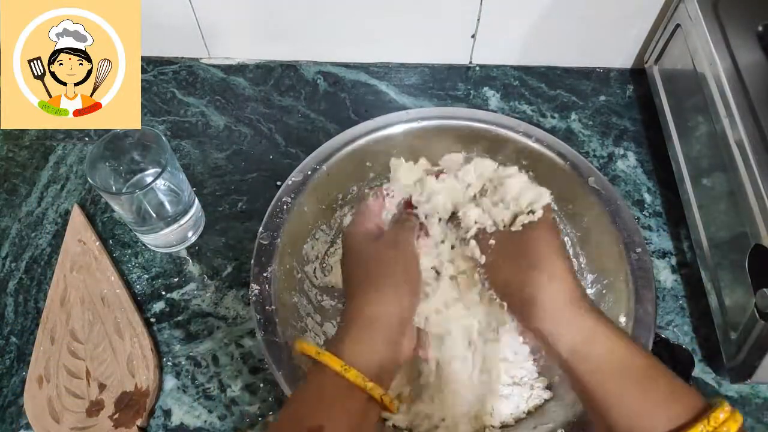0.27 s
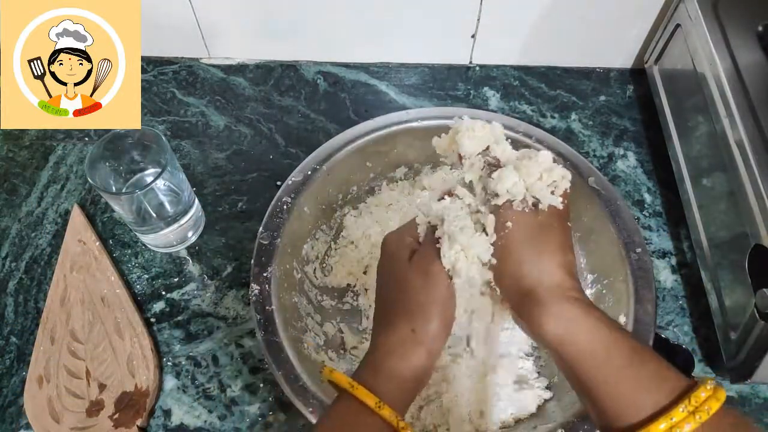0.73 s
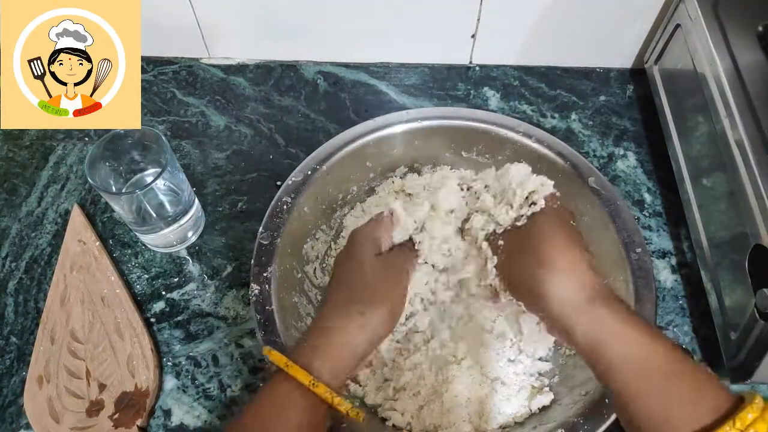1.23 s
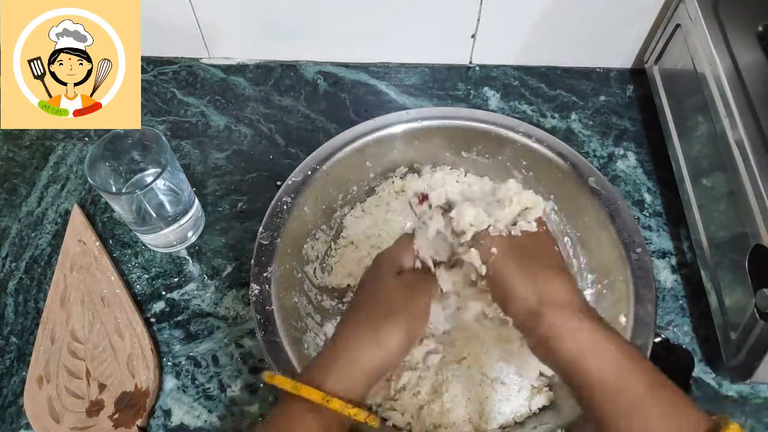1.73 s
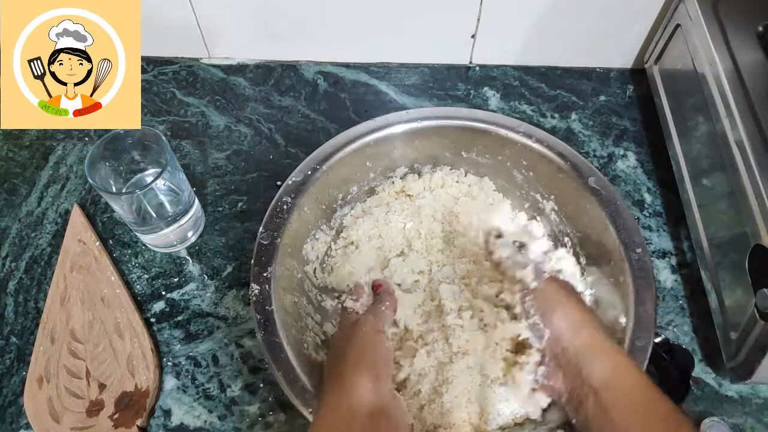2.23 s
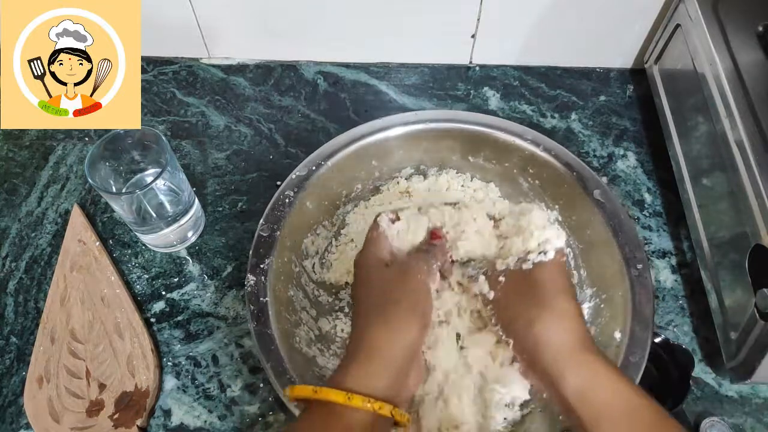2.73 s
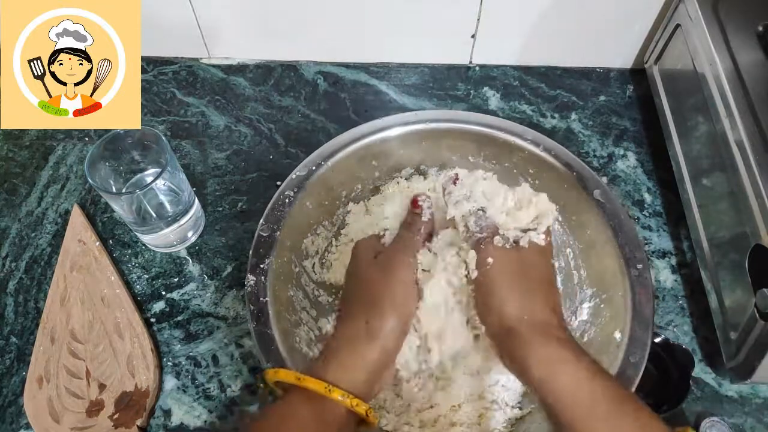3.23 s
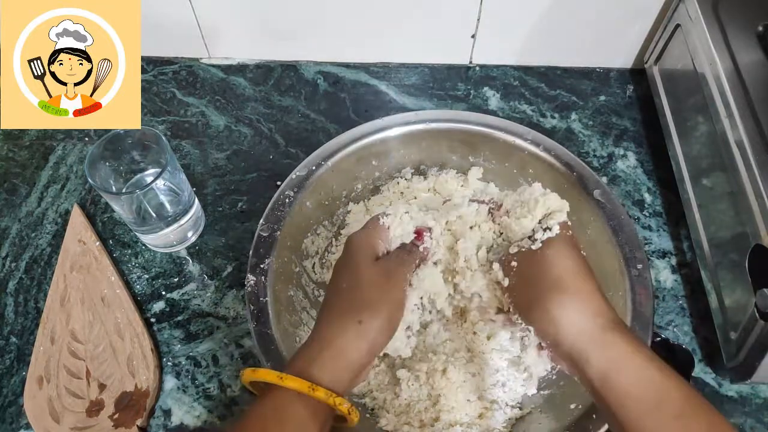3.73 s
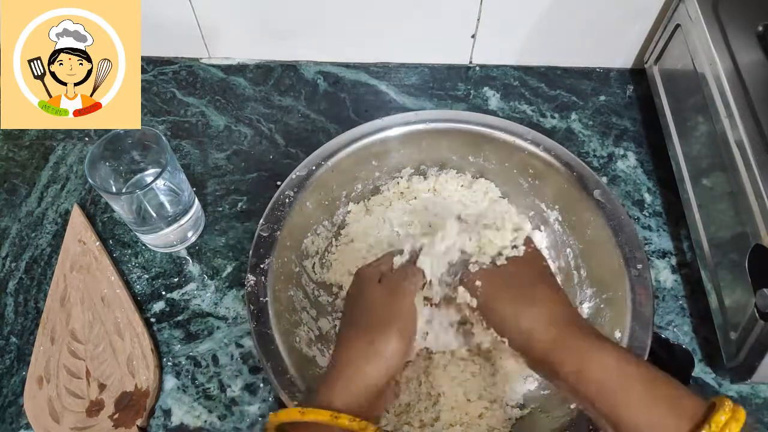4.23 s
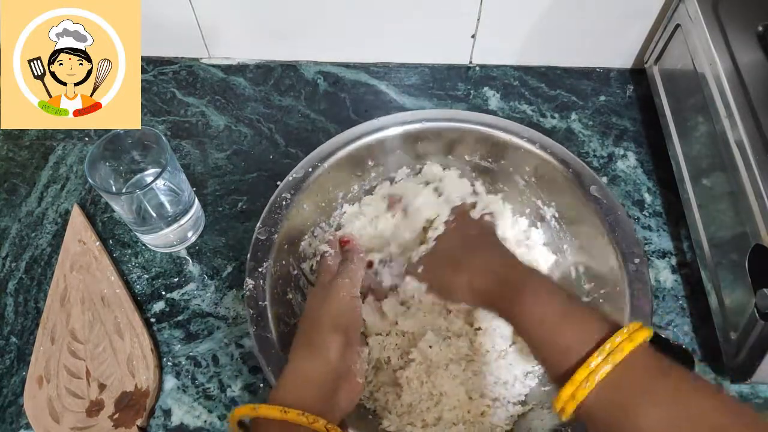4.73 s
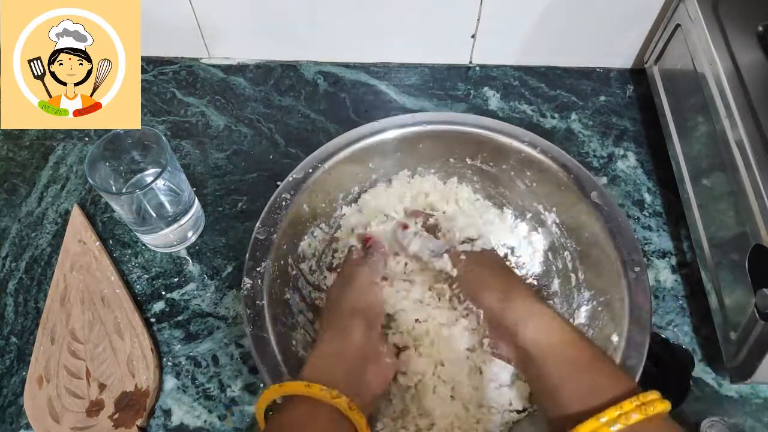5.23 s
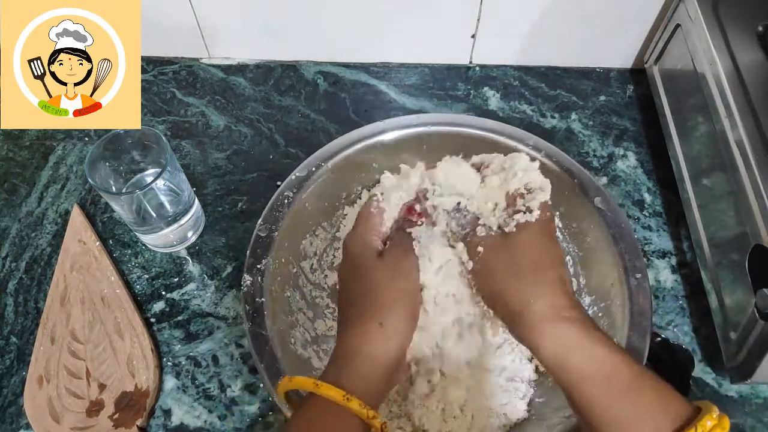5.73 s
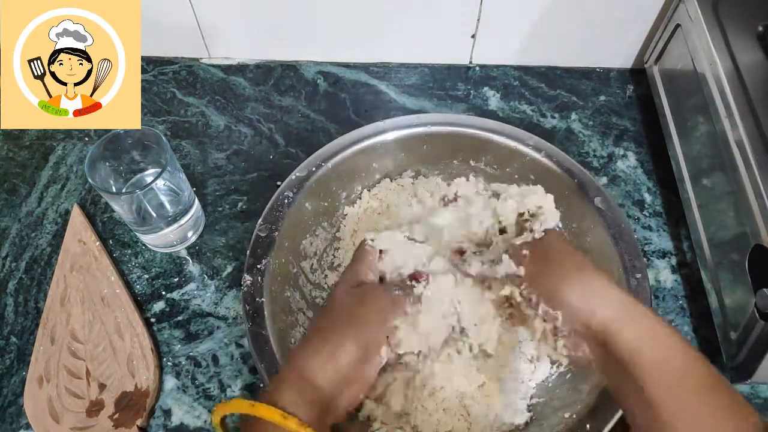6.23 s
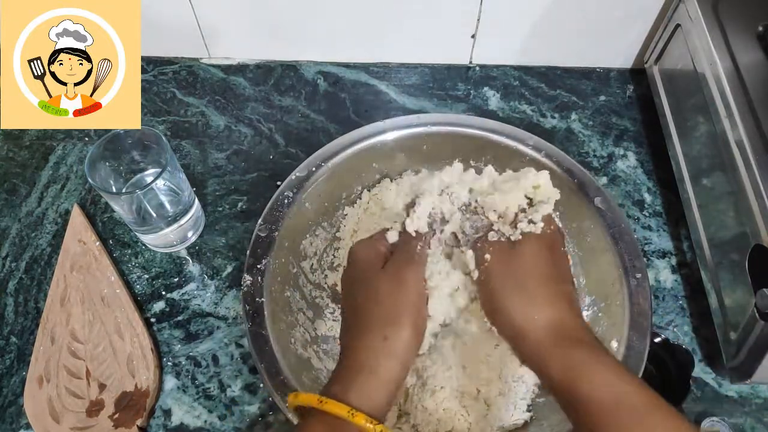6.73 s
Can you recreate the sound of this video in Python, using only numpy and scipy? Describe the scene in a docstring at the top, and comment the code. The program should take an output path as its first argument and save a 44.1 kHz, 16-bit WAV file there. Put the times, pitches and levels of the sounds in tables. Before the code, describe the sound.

A wide steel bowl knocks, rings and rattles on a stone counter. Two hands then rub a crumbly flour mixture in it, with soft rustling, brief swishes and light ticks of nails and crumbs on the metal. Past the middle a nail scrapes once and the bowl rocks and clanks again. Two short rough scuffs come near the end. A small tiled kitchen drones faintly underneath.

```python
"""A wide steel bowl knocks, rings and rattles on a stone counter, over a small tiled kitchen's low drone.
Two hands rub a crumbly flour mixture in it, and now and then it rocks on the stone again.
Lumps rustle, flour swishes over the steel, crumbs and nails tick, and a fingertip makes the wall sing.
A nail scrapes once, and two short rough scuffs come near the end.
Noise suppression turns quiet treble down, so the faintest rubbing fades in and out."""
import sys
import numpy as np
from scipy import signal
from scipy.fft import rfft, irfft
from scipy.io import wavfile
from scipy.ndimage import uniform_filter1d

SR = 44100
rng = np.random.default_rng(int(sys.argv[2]) if len(sys.argv) > 2 else 0)


def pcm_store(signal):
    """Save signal as 16-bit PCM."""
    levels = np.round(np.clip(np.atleast_2d(signal), -1, 1) * 32767)
    wavfile.write(sys.argv[1], SR, levels.astype(np.int16).T)


N = 307893


def amp(db):
    """Decibels to gain."""
    return 10 ** (np.asarray(db) / 20)


def unit(x):
    """Scales to rms 1."""
    return x / np.sqrt(np.mean(x ** 2) + 1e-20)


def read(points, hz):
    """Reads a curve on a log-frequency axis."""
    f, value = np.transpose(points)
    return np.interp(np.log(hz + 1), np.log(f + 1), value)


def add(mix, s, sound):
    """Mixes a sound in at time s."""
    part = mix[max(round(s * SR), 0):][:len(sound)]
    part += sound[:len(part)]


def attack(t, rise_s):
    """An envelope that eases up from 0 to 1."""
    return 1 - np.exp(-t / rise_s)


def decay(t, t60):
    """An envelope that falls 60 dB in t60 seconds."""
    return amp(-60 * t / t60)


def noise(count, db_at):
    """Noise of rms 1 whose spectrum follows a rule in dB."""
    spectrum = rfft(rng.standard_normal(count))
    return unit(irfft(spectrum * amp(db_at(np.fft.rfftfreq(count, 1 / SR))), count))


def wander(count, hz):
    """Slow random motion of rms 1."""
    return noise(count, lambda f: -10 * np.log10(1 + (f / hz) ** 4))


def impacts(count, per_s, spread_db):
    """Randomly timed impulses of uneven size."""
    hits = rng.random(count) < per_s / SR
    return hits * amp(spread_db * np.minimum(rng.exponential(1, count), 3))


def narrow_band(x, hz, width_hz):
    """Two resonators in series that follow the pitch hz; the result has rms 1."""
    turn = np.exp(2j * np.pi * np.cumsum(hz * np.ones(len(x))) / SR)
    pole = np.exp(-np.pi * width_hz / SR)
    for _ in range(2):
        x = (turn * signal.lfilter([1 - pole], [1, -pole], x / turn)).real
    return unit(x)


def patchy(x, depth_db, across_hz, lasting_s):
    """Makes a sound flicker in small patches of pitch and time."""
    hz, t, z = signal.stft(x, SR, nperseg=1024, noverlap=768)
    bell = lambda u: np.exp(-2 * u ** 2)
    steps = np.arange(-15, 16)
    blur = np.outer(bell(steps * hz[1] / across_hz), bell(steps * t[1] / lasting_s))
    patches = unit(signal.fftconvolve(rng.standard_normal(z.shape), blur, "same"))
    gain = unit(amp(depth_db * np.minimum(patches, 2)))
    return signal.istft(z * gain, SR, nperseg=1024, noverlap=768)[1][:N]


# Low bed of the room tone: (frequency [Hz], level [dB])
DRONE_COLOUR = [(18, -79), (30, -45.5), (48, -56.5), (65, -30), (129, -14.5), (162, -10.5), (188, -15.5),
                (228, -13.5), (307, -4), (392, -6.5), (526, -5.5), (630, -13), (888, -10.5), (1140, -19),
                (1500, -24.5), (1950, -59), (3300, -120)]
# Hums in the bed: (centre [Hz], width [Hz], level [dB])
HUMS = [(195.5, 34, -69), (320.4, 17, -72)]
# Air on top: (frequency [Hz], level [dB])
HISS_COLOUR = [(30, -47), (800, -7), (1400, -5), (2000, 2.5), (4200, 3.5), (5200, -5.5), (7000, -8),
               (14000, -7.5)]


def drone(bed_db=-63.5, hiss_db=-75):
    """Steady low room tone with two wavering hums and a trace of hiss."""
    bed = amp(bed_db) * noise(N, lambda f: read(DRONE_COLOUR, f))
    for hz, width, db in HUMS:
        bed += amp(db) * narrow_band(rng.standard_normal(N), hz, width)
    return bed + amp(hiss_db) * noise(N, lambda f: read(HISS_COLOUR, f))


# Modes of the bowl, damped by the flour in it: (pitch [Hz], level [dB], base t60 [s])
BOWL_MODES = [(545, -19, .11), (592, -16.5, .14), (650, -16, .11), (728, -19, .22), (802, -24, .3),
              (978, -22, .3), (708, -15.5, .2), (858, -16, .24), (960, -18, .22), (1044, -21, .25),
              (1400, -27, .3), (1553, -15, .2), (1761, -18, .3), (2092, -12, .25), (2120, -15, .18),
              (2482, -12, .16), (2511, -4.5, .21), (2865, -5.5, .22), (3260, -17, .2), (3390, -24, .18),
              (3510, -24, .15), (3980, -11, .15), (4048, -11, .17), (4160, -11, .13), (4200, -12, .15),
              (4316, -7, .17), (4486, -13, .17), (4635, -16, .13), (4808, -15, .12), (4985, -15, .13),
              (5052, -11, .18), (5101, -11, .18), (6120, -26, .12)]
# Its dense, short-lived higher-order ringing: (frequency [Hz], level [dB])
CLATTER_COLOUR = [(100, -48.5), (220, -23), (480, -21), (580, 1), (950, -7.5), (1220, -27), (1600, -2.5),
                  (2600, 1), (3300, -3), (4300, 8), (5050, -7), (5500, -8), (6400, -13.5), (14000, -28.5)]
# Hits on the stone: (time [s], level [dB], lows [dB], mids [dB], highs [dB], sizzle [dB],
# mode favoured by the contact point [Hz], its extra layer [dB])
KNOCKS = [(.0095, -25.5, -0.5, 1.5, 2.5, 6, 2511, -2.5), (0.0161, -34, -2.5, -5, 0, 7, 4048, 2),
          (0.0893, -24.5, -2.5, -4.5, 1, 3, 2865, -0.5), (.423, -55, 8, -1, 0, -7.5, 4316, -11),
          (2.5765, -50.5, 11.5, -8, -18.5, -20, 2511, -28), (4.7847, -32.5, 8, -0.5, -13, -36, 2482, 12.5),
          (4.801, -37.5, 7.5, -8, -9.5, -22.5, 2482, 1), (5.258, -53.5, -4, 1, -5, -14, 2120, 0),
          (5.2809, -37.5, -3, -2, -7.5, -11.5, 4316, 18), (5.3474, -48.5, 10.5, -3, -8.5, -10, 2092, 12),
          (5.398, -62.5, 1, -10, -17, -16.5, 2092, 13), (5.486, -53, 11.5, -4, -8.5, -5.5, 2120, 16),
          (5.582, -68, -1, -13, -14, -21, 2092, 12)]


def knocks(damping=0.61, linger=1.7, scatter_db=-9, scatter_s=0.028, detune=0.0015,
           clatter_db=1.5, tail_db=-14, sizzle_db=-12):
    """The bowl hits stone: a clatter, modes that die fast as it presses down, then a diffuse ring."""
    out, t = np.zeros(N), np.arange(SR // 2) / SR
    steps = np.arange(0, t[-1], scatter_s)
    for s, db, low_db, mid_db, high_db, top_db, favoured_hz, extra_db in KNOCKS:
        # only hard contacts, bare steel on stone, reach the top of the spectrum
        contact_eq = [(1000, low_db), (1600, 0), (2950, 0), (3400, mid_db), (3750, mid_db),
                      (4100, high_db), (5200, high_db), (6300, top_db)]
        favoured = np.argmin([abs(mode[0] - favoured_hz) for mode in BOWL_MODES])
        ring = np.zeros(len(t))
        for k, (hz, mode_db, t60) in enumerate(BOWL_MODES):
            direct = (1 + (k == favoured) * amp(extra_db)) * decay(t, t60 * damping)
            # reflections return each mode with a drifting strength and phase
            drift = rng.standard_normal(len(steps)) + 1j * rng.standard_normal(len(steps))
            bloom = amp(scatter_db) * attack(t, scatter_s / 2) * decay(t, t60 * linger)
            diffuse = bloom * np.interp(t, steps, drift)
            # hands and flour load the wall differently each time
            loaded_hz = hz * (1 + detune * rng.uniform(-1, 1))
            tone = np.exp(2j * np.pi * (loaded_hz * t + rng.random()))
            ring += amp(mode_db + read(contact_eq, hz)) * ((direct + diffuse) * tone).real
        shelf = [(6500, 0), (7000, sizzle_db)]
        clatter = noise(len(t), lambda f: read(CLATTER_COLOUR, f) + read(contact_eq, f) + read(shelf, f))
        clatter *= amp(clatter_db) * decay(t, t60=0.035) + amp(tail_db) * decay(t, t60=0.37)
        add(out, s, amp(db) * (ring + clatter) * attack(t, rise_s=0.0012))
    return out


# The bowl's hollow notes: (low [Hz], middle [Hz], high [Hz])
HOLLOW_HZ = (708, 859, 963)
# Their blooms: (time [s], time to peak [s], low note [dB], middle note [dB], high note [dB])
HOLLOW_SWELLS = [(.0095, 0.034, -53.5, -43, -62), (.0895, 0.032, -53, -44, -55),
                 (2.5765, 0.027, -65, -58.5, -63), (4.7845, 0.052, -53.5, -44, -54.5),
                 (5.2808, 0.018, -47, -61, -49)]


def hollow_ring(waver_db=2):
    """The bowl rocks free after a knock, and three low modes swell into a hollow note."""
    out, t = np.zeros(N), np.arange(SR // 2) / SR
    for s, swell_s, *levels_db in HOLLOW_SWELLS:
        swell = t / swell_s * np.exp(1 - t / swell_s)
        for hz, db in zip(HOLLOW_HZ, levels_db):
            gain = amp(db + waver_db * wander(len(t), hz=30))
            add(out, s, swell * gain * np.sin(2 * np.pi * (hz * t + rng.random())))
    return out


# Low body of the counter under the bowl: (pitch [Hz], level [dB], t60 [s])
COUNTER_MODES = [(261, -48.5, .2), (300.2, -52, .08), (375, -52, 0.25)]


def thud(start_s=0.018):
    """The full weight of the bowl lands once and shakes the counter."""
    out, t = np.zeros(N), np.arange(SR // 3) / SR
    body = sum(amp(db) * decay(t, t60) * np.sin(2 * np.pi * hz * t) for hz, db, t60 in COUNTER_MODES)
    add(out, start_s, body * attack(t, rise_s=0.0066))
    return out


# Chatter after a knock: (time [s], level [dB], t60 [s])
RATTLES = [(.11, -46.5, 0.25), (4.795, -51.5, 0.44), (4.848, -49.5, 0.29), (5.29, -55, 0.55)]
# Its mid-heavy tone: (frequency [Hz], level [dB])
RATTLE_COLOUR = [(300, -25.5), (560, -1.5), (780, 0), (1020, -2), (1250, -10.5), (1700, -7), (2500, -5.5),
                 (3300, -9), (4300, -7), (5100, -14), (6000, -32.5)]


def rattles(ring_s=0.0083):
    """The bowl chatters on the stone as it settles: a run of small uneven contacts that dies away."""
    out, t = np.zeros(N), np.arange(SR // 2) / SR
    for s, db, t60 in RATTLES:
        contacts = impacts(len(t), per_s=170, spread_db=3)
        chatter = unit(signal.lfilter([1], [1, -np.exp(-1 / (ring_s * SR))], contacts))
        envelope = amp(db) * attack(t, rise_s=0.012) * decay(t, t60)
        add(out, s, envelope * chatter * noise(len(t), lambda f: read(RATTLE_COLOUR, f)))
    return kitchen(out, wet_db=-13)


# Reverb time of the tiled room: (frequency [Hz], t60 [s])
KITCHEN_DECAY = [(200, 0.91), (1300, 0.9), (3500, 0.47), (6500, 0.12), (12000, 0.35)]


def kitchen(x, wet_db, predelay_s=0.0017):
    """Adds the echoes of tiles and counter: sparse taps, each band dying at its own speed."""
    taps = rng.choice([-1., 1.], SR // 2) * (rng.random(SR // 2) < 0.1)
    taps[:int(predelay_s * SR)] = 0
    hz, t, z = signal.stft(taps, SR, nperseg=256)
    tail = signal.istft(z * decay(t, read(KITCHEN_DECAY, hz)[:, None]), SR, nperseg=256)[1]
    return x + amp(wet_db) * signal.fftconvolve(x, tail / np.linalg.norm(tail))[:N]


# The fingers close on the mixture and let it fall: (firmest moment [s], length [s], level [dB])
SQUEEZES = [(0.44, .36, -70), (1.054, 0.17, -68), (1.278, 0.4, -79), (2.44, 0.4, -72), (2.95, .15, -76),
            (3.251, .3, -70), (3.583, 0.34, -70.5), (4.193, .2, -76.5), (4.52, 0.21, -74.5),
            (5.257, 0.3, -64), (5.764, 0.18, -74.5), (6.136, 0.37, -78)]


def squeezing(stirring_db=-76):
    """Finger effort as a gain: each squeeze swells and relaxes, and the hands never quite rest."""
    t = np.arange(N) / SR
    swells = sum(amp(db) * np.cos(np.pi * np.clip((t - s) / length, -0.5, 0.5)) ** 2
                 for s, length, db in SQUEEZES)
    return amp(stirring_db) + swells


def kneading(trim_db=-1, lumpy_db=2):
    """Soft lumps break and fall back on the heap with a dull, uneven rustle."""
    colour = [(100, -9), (350, 0.5), (900, 1), (1400, 0), (1900, -16.5),
              (3000, -12.5), (5000, -29.5), (9000, -48)]  # (frequency [Hz], level [dB])
    rustle = patchy(noise(N, lambda f: read(colour, f)), depth_db=5, across_hz=230, lasting_s=0.073)
    return rustle * squeezing() * amp(trim_db + lumpy_db * wander(N, hz=31.8))


def crumbs(trim_db=-7, tilt_db_per_octave=-2.5, pitches=48, per_s=130, ring_s=0.006):
    """Falling crumbs each wake a brief, faint ring somewhere in the bowl's wall."""
    out, t = np.zeros(N), np.arange(SR // 12) / SR
    for hz in np.geomspace(900, 4200, pitches):
        landings = impacts(N, per_s / pitches, spread_db=2.5)
        ping = t / ring_s * np.exp(-t / ring_s) * np.sin(2 * np.pi * hz * rng.uniform(1, 1.02) * t)
        out += amp(tilt_db_per_octave * np.log2(hz / 2000)) * signal.oaconvolve(landings, ping)[:N]
    return unit(out) * squeezing() * amp(trim_db)


# A hand pushes flour along: (time [s], length [s], level [dB], starting centre [Hz], width [Hz])
STROKES = [(0.287, 0.13, -61, 4800, 2600), (0.532, 0.082, -67.5, 3740, 500),
           (1.03, 0.047, -73.5, 1880, 696), (1.002, 0.12, -75, 3800, 760), (1.23, 0.056, -65, 4100, 1100),
           (1.915, 0.082, -58.5, 4260, 2020), (2.216, 0.25, -66, 4060, 1130), (3.51, 0.042, -70, 3374, 895),
           (4.673, 0.13, -67, 4140, 1780), (5.1, 0.17, -61.5, 4040, 3170), (5.732, 0.03, -77.5, 3830, 1005),
           (5.904, 0.041, -74.5, 3650, 1014), (6.246, 0.19, -80, 4250, 1398)]


def strokes(grains_per_s=500, grain_db=0.5, flutter_db=2, brushing_db=-88,
            attack_s=0.022, swell_db=3, release_s=0.018, sink_octaves_per_s=1):
    """Countless grains slip over the steel: a swish for each push, over a light constant brushing."""
    grains = amp(grain_db * np.minimum(rng.exponential(1, N), 4)) * (rng.random(N) < grains_per_s / SR)
    grit = unit(grains * rng.choice([-1, 1], N)) + rng.standard_normal(N)
    grit = signal.sosfilt(signal.butter(3, 2400, "high", fs=SR, output="sos"), grit)
    out = amp(brushing_db) * narrow_band(grit, hz=3500, width_hz=2200)
    t = np.arange(SR // 2) / SR
    for s, length, db, hz, width in STROKES:
        # the hand bites, presses harder and lets go; its hiss sinks as it slides down the wall
        moved_s = np.minimum(t, length)
        bite = np.minimum(t / attack_s, 1)
        press = amp(swell_db * (moved_s / length - 1))
        release = np.exp((moved_s - t) / release_s)
        centre_hz = hz * 2 ** (-sink_octaves_per_s * moved_s)
        hiss = narrow_band(grit[round(s * SR):][:len(t)], centre_hz, width)
        add(out, s, amp(db) * bite * press * release * hiss)
    return kitchen(out * amp(flutter_db * wander(N, hz=25)), wet_db=-4)


# Steel colour under a light touch: (frequency [Hz], gain [dB])
WALL_EQ = [(1600, -7.5), (2450, 5.5), (2850, -2), (3300, 1), (3700, 4), (4300, 1.5), (4700, -4), (5150, 0),
           (5700, -8.5), (6200, 0), (6600, -9)]


def bowl_wall(x):
    """Light contacts are heard through the broad resonances of the bowl's wall."""
    hz = np.linspace(0, SR / 2, 513)
    return signal.oaconvolve(x, signal.firwin2(513, hz, amp(read(WALL_EQ, hz)), fs=SR), "same")


# Thin whistles off the wall: (time [s], length [s], level [dB], start pitch [Hz], end pitch [Hz])
WHISTLES = [(.3, .5, -77, 1580, 1470), (0.55, .55, -78.5, 3380, 3290), (2.8, .3, -77.5, 3760, 3700),
            (3.39, .32, -78, 3640, 3500), (6.23, .14, -78, 4270, 4130)]


def singing(width_hz=140, catch_db=4):
    """A fingertip rubs fuzzy whistles from the steel; they swell, catch, sink a little and fade."""
    out = np.zeros(N)
    for s, length, db, from_hz, to_hz in WHISTLES:
        count = round(length * SR)
        tone = narrow_band(rng.standard_normal(count), np.linspace(from_hz, to_hz, count), width_hz)
        grip = amp(db + catch_db * wander(count, hz=20))
        add(out, s, grip * tone * signal.windows.tukey(count, 0.5))
    return out


# Bright clicks on the steel: (time [s], level [dB], centre [Hz], half-width [octaves])
TICKS = [(.306, -49.5, 4600, 0.19), (0.344, -41, 4670, 0.32), (0.353, -38, 4750, 0.56),
         (.590, -41, 3560, 0.39), (0.846, -53.5, 4420, 0.14), (.983, -56, 5160, 0.12),
         (1.121, -44.5, 4770, 0.23), (1.185, -43, 4500, 0.12), (1.245, -50.5, 4440, 0.15),
         (1.87, -57, 4130, .16), (1.267, -61, 4120, 0.17), (1.9237, -39, 4460, 0.2),
         (1.954, -41, 3320, 0.72), (2.024, -49, 4470, 0.44), (2.154, -57.5, 4140, 0.091),
         (2.23, -52.5, 4400, 0.094), (2.639, -55, 3300, 0.23), (2.701, -49, 3390, 0.23),
         (2.822, -56, 3650, 0.096), (2.902, -52.5, 3480, 0.16), (2.9295, -48, 3560, 0.19),
         (3.025, -57, 3600, 0.13), (3.054, -46, 3320, 0.24), (3.103, -42, 3550, 0.25),
         (3.226, -48, 3600, 0.16), (3.244, -55, 3890, 0.2), (3.508, -45.5, 3390, 0.15),
         (3.583, -48, 3500, 0.14), (3.885, -64, 2520, .14), (4.16, -55.5, 4180, 0.32),
         (4.669, -45.5, 4400, 0.11), (5.524, -48, 3204, 0.47), (6.3553, -42, 3370, 0.62),
         (6.767, -60, 3300, .06)]


def ticks(trim_db=-1, snap_s=0.0037, wash_db=-20.5, rim_db=-18, rim_hz=6150, rim_width_hz=130):
    """Crumbs and fingernails strike the steel: a dry snap, then a diffuse wash from bowl and room."""
    out, t = np.zeros(N), np.arange(SR // 3) / SR
    snap = attack(t, rise_s=0.0015) * np.exp(-t / snap_s)
    wash = amp(wash_db) * attack(t, rise_s=0.0022) * decay(t, t60=0.46)
    rim = lambda f: rim_db - ((f - rim_hz) / rim_width_hz) ** 2  # each tick wakes a thin high ring
    for s, db, hz, octaves in TICKS:
        band = lambda f: -10 * np.log10(1 + (np.log2((f + 1) / hz) / octaves) ** 6)
        colour = lambda f: np.maximum(band(f), rim(f))
        contact = unit(noise(len(t), colour) * snap) * np.sqrt(np.mean(snap ** 2))
        add(out, s, amp(db + trim_db) * (contact + noise(len(t), colour) * wash))
    return out


# The one nail scrape: (time [s], hold [s], level [dB])
SCRAPE = (4.399, 0.00515, -49.5)
# Its steely edge: (frequency [Hz], level [dB])
SCRAPE_COLOUR = [(1200, -35.5), (1800, -28.5), (2000, -3.5), (2450, 5), (2900, -6), (3350, 0.5),
                 (3850, -12.5), (4600, -3.5), (5200, -11), (6400, -18.5), (7500, -20), (12000, -44.5)]


def scrape(release_s=0.0031, tail_db=-5.5):
    """A fingernail drags briefly over the steel, and the sound fades smoothly in the room."""
    s, hold_s, db = SCRAPE
    out, t = np.zeros(N), np.arange(SR // 2) / SR
    drag = np.exp(-np.maximum(t - hold_s, 0) / release_s)
    tail = amp(tail_db) * decay(t, t60=0.27)
    rasp = noise(len(t), lambda f: read(SCRAPE_COLOUR, f))
    add(out, s, amp(db) * rasp * (drag + tail) * attack(t, rise_s=0.0007))
    return out


# The closing scuffs: (time [s], level [dB], hold [s], tilt [dB/octave])
SCUFFS = [(6.391, -42, 0.044, 5.5), (6.88, -47, 0.028, -0.5)]
# Their coarse midrange: (frequency [Hz], level [dB])
SCUFF_COLOUR = [(300, -32.5), (750, -4.5), (1300, -2.5), (1650, -5), (2100, 0), (2800, -10.5), (3900, -8),
                (5000, -21.5), (6300, -32), (8000, -41.5)]


def scuffs(trim_db=-5, release_s=0.057, rough_db=2, tail_db=-3):
    """Short dense bursts of friction that linger in the room."""
    out, t = np.zeros(N), np.arange(SR // 2) / SR
    for s, db, hold_s, tilt_db in SCUFFS:
        colour = lambda f: read(SCUFF_COLOUR, f) + tilt_db * np.log2(np.maximum(f, 500) / 2000)
        rasp = noise(len(t), colour)
        after_s = np.maximum(t - hold_s, 0)
        direct = np.exp(-after_s / release_s) * amp(rough_db * wander(len(t), hz=146))
        tail = amp(tail_db) * decay(after_s, t60=0.47)
        add(out, s, amp(db + trim_db) * rasp * (direct + tail) * attack(t, rise_s=0.0064))
    return out


def dull(x, corner_hz=6550, shelf_db=-22):
    """A high shelf: soft contacts carry little top end."""
    lows = signal.oaconvolve(x, signal.firwin(161, corner_hz, fs=SR), "same")
    return lows + amp(shelf_db) * (x - lows)


def scene():
    """Bowl, flour and room tone, all mixed dead centre."""
    swish = patchy(strokes(), depth_db=3.5, across_hz=240, lasting_s=0.07)
    touches = patchy(ticks(), depth_db=3.5, across_hz=300, lasting_s=0.09)
    flour = bowl_wall(swish + touches) + singing() + kneading() + crumbs()
    hits = knocks() + hollow_ring() + thud()
    soft_contacts = dull(rattles() + flour + scrape() + scuffs())
    mono = hits + soft_contacts + drone()
    return np.array([mono, mono])


# Depth of the noise gate when shut: (frequency [Hz], cut [dB])
GATE_DEPTH = [(900, 0.5), (1300, 11.5), (1900, 12), (14000, 17)]


def suppress_noise(x, margin_db=3.5, top_margin_db=3, knee_db=0.6, memory=0.6):
    """A soft spectral gate turns down treble that lies near its own noise floor."""
    hz, _, z = signal.stft(x, SR, nperseg=1024, noverlap=768)
    power = uniform_filter1d(abs(z) ** 2, size=7, axis=0)
    power = signal.lfilter([1 - memory], [1, -memory], power, axis=1)
    power_db = 10 * np.log10(abs(power) + 1e-20)
    floor_db = uniform_filter1d(np.percentile(power_db, 20, axis=1), size=15)
    # the top octave opens less readily
    threshold_db = floor_db + margin_db + read([(6000, 0), (7500, top_margin_db)], hz)
    shut = 0.5 - 0.5 * np.tanh((power_db - threshold_db[:, None]) / (2 * knee_db))
    gain = amp(-read(GATE_DEPTH, hz)[:, None] * shut)
    return signal.istft(z * gain, SR, nperseg=1024, noverlap=768)[1][:N]


def record(dry, low_cut_hz=75, high_cut_hz=14200):
    """The output chain: rumble filter, noise suppression and a steep high cut."""
    mono = signal.sosfilt(signal.butter(2, low_cut_hz, "high", fs=SR, output="sos"), dry.mean(0))
    mono = suppress_noise(mono)
    mono = signal.oaconvolve(mono, signal.firwin(511, high_cut_hz, window=("kaiser", 9), fs=SR), "same")
    return np.array([mono, mono])


dry = scene()
out = record(dry)
pcm_store(out)
```